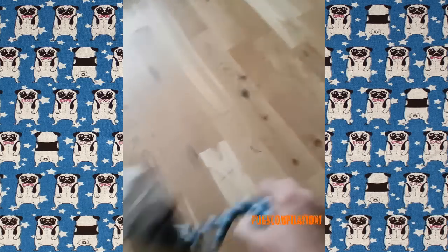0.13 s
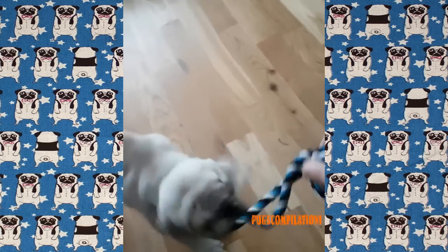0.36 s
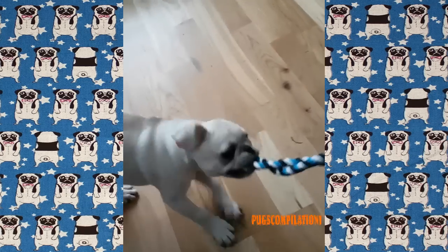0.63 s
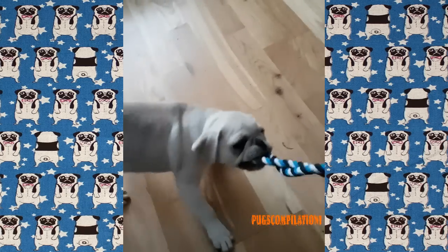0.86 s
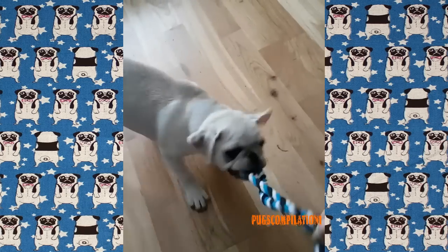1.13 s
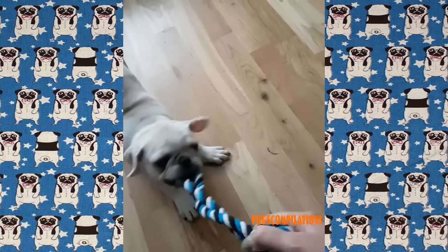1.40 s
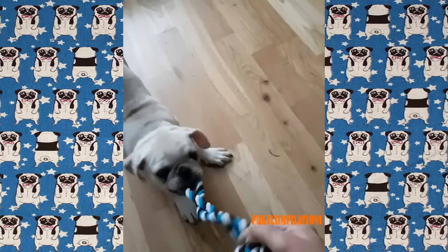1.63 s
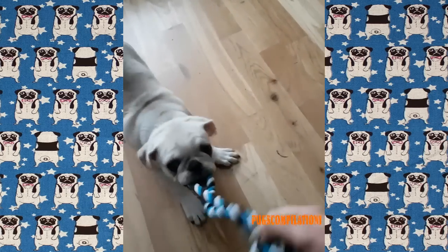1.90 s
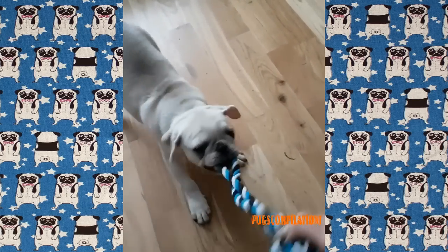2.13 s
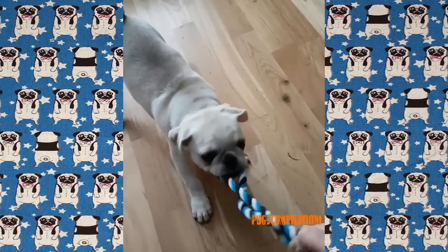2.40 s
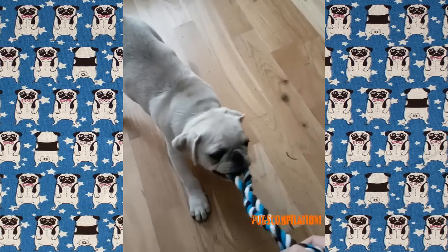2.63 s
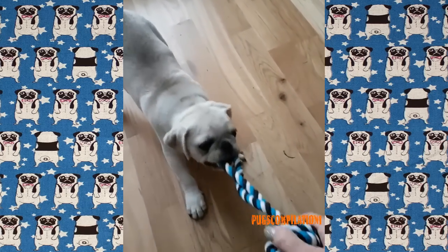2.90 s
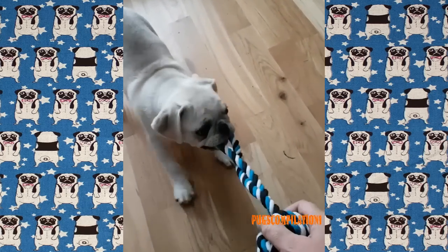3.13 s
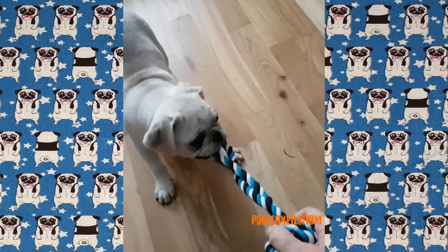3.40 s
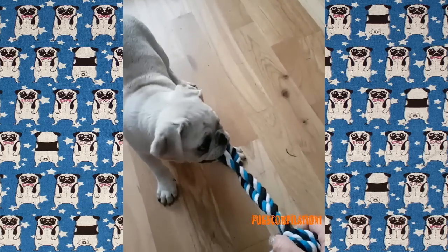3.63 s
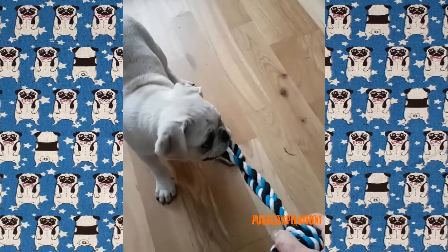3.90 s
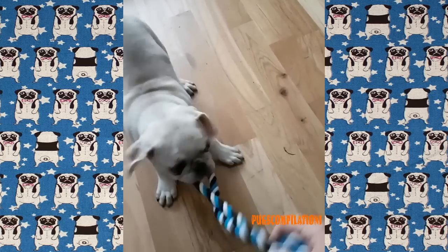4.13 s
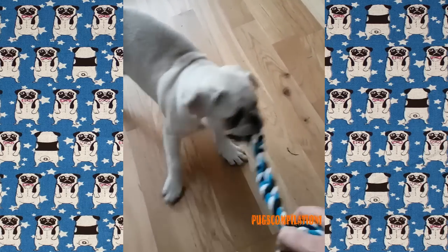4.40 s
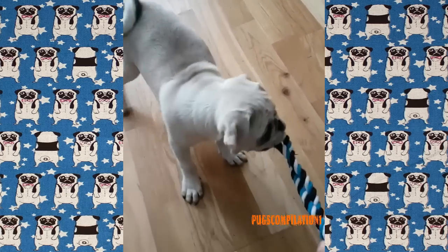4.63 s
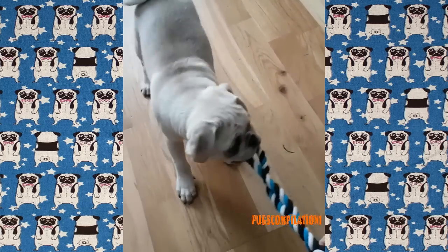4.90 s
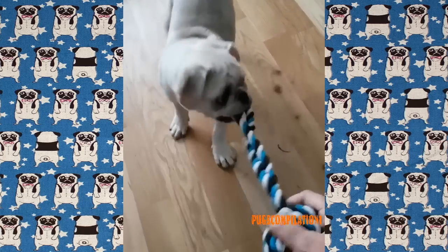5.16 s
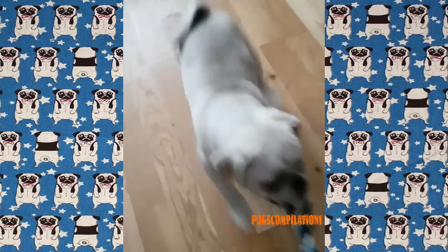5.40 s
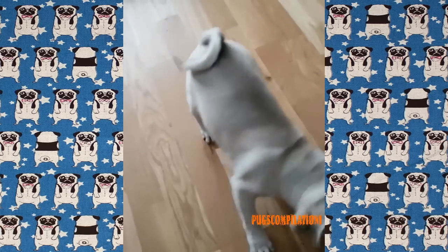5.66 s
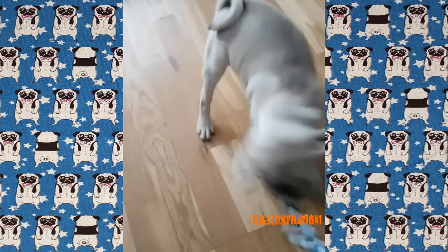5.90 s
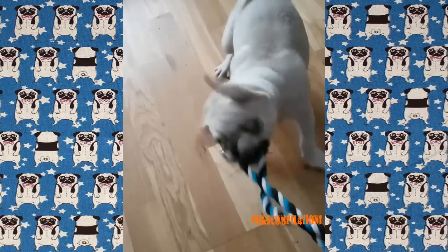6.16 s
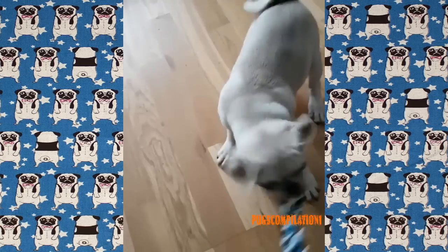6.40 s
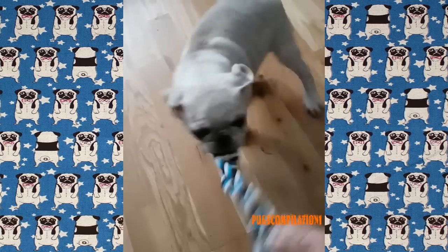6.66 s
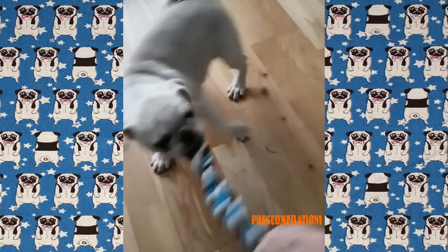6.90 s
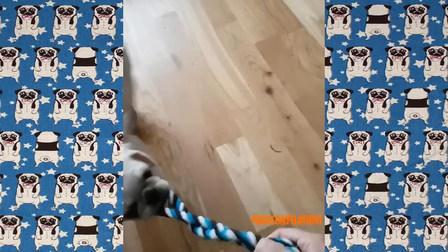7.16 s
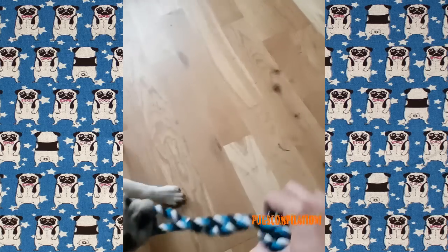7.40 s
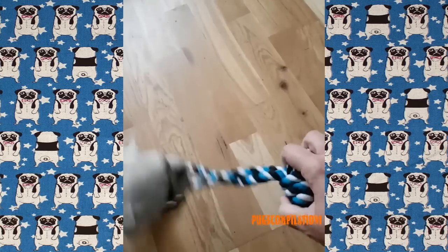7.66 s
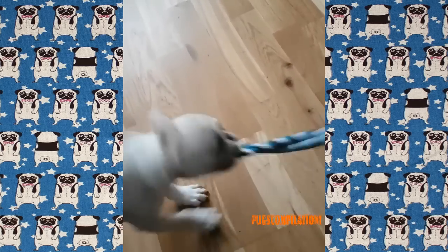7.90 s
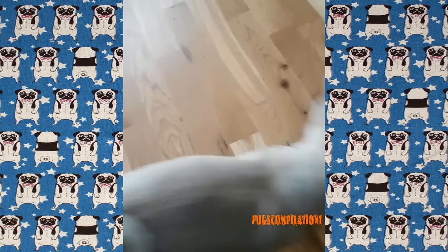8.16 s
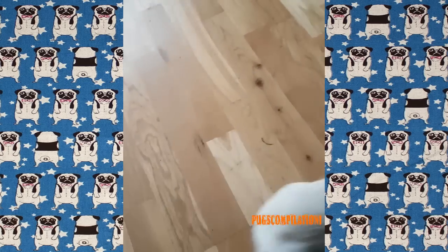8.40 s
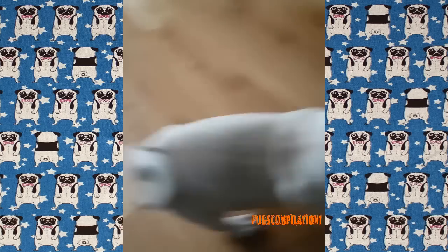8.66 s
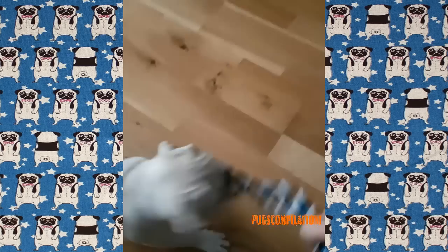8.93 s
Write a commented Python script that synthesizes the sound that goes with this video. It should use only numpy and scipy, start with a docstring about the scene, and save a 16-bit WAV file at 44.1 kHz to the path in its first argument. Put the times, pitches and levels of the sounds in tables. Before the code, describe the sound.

Close, throaty puppy growls come in short playful bursts, snuffling breaths between them, a thin tag rattle, soft indoor hum beneath.

```python
"""A young flat-faced dog growls in bursts around a rope that it tugs, in a small room.
Uneven vocal pulses and noisy puffs ring chest, jaw, mouth and nose; breaths rasp between and under the growls.
A small metal tag tinks now and then: narrow-band noise that dies away while it rattles.
Shaped noise and two wavering hum tones lie under it; sparse echoes make the room.
Two close microphone ports hear the dog and tag with a small difference in level and time."""
import sys
import numpy as np
from scipy import signal
from scipy.fft import rfft, irfft
from scipy.io import wavfile
from scipy.ndimage import uniform_filter1d

SR = 44100
rng = np.random.default_rng(int(sys.argv[2]) if len(sys.argv) > 2 else 0)


def output_pcm(signal):
    """Save a mono or channel-first signal as 16-bit PCM at the path in sys.argv[1].

    Samples are clipped to [-1, 1] before scaling.
    """
    pcm = np.clip(np.atleast_2d(signal).T, -1, 1) * 32767
    wavfile.write(sys.argv[1], SR, np.round(pcm).astype(np.int16))


def amplitude_ratio(level_db):
    """Convert a level in decibels to the matching linear amplitude (field) ratio."""
    exponent = np.asarray(level_db, float) / 20
    return 10 ** exponent


N = 398663  # length in samples

# One curve a growl or part of one; the growl from .565 s turns clearer at 1.075 s.
# Points of: time_s, chest_level_db, snarl_over_chest_db, pitch_hz
GROWL_CURVES = [
    [(0, -35.5, 10, 198.7), (.068, -31.5, 2, 216.2), (.12, -43, 6, 195.2)],
    [(.235, -42, -4.5, 295.6), (.275, -30, -2, 270), (.302, -32, 3.5, 255.3), (.365, -32, -0.5, 252.4),
     (.41, -30.5, 2, 207.6), (.44, -36.5, 0, 195.5), (.49, -42, -5, 149.4)],
    [(.565, -36, -3, 159.7), (.68, -31.5, -3.5, 159.7), (.7, -35.5, 1.5, 162.9), (1.0, -29, -5, 174.1),
     (1.06, -37.5, 6, 189.8)],
    [(1.075, -39, 6, 193.3), (1.25, -37, 3, 197.5), (1.32, -37.5, -5.5, 150)],
    [(1.679, -50, 3.5, 145.6), (1.706, -38.5, -7, 155), (1.85, -40.5, -2, 155.2), (1.98, -33, -4, 153.5),
     (2.21, -45.5, -7, 204.5)],
    [(2.887, -46, -6, 154.7), (3.0, -47.5, -8, 160.9), (3.11, -64, 4, 204.9)],
    [(4.225, -54, 3, 192.7), (4.238, -35.5, -0.5, 188), (4.32, -46.5, 1, 174.7)],
    [(4.463, -41.5, 0, 202.4), (4.667, -35.5, 2, 196.5), (4.84, -30, -4.5, 196), (4.95, -28.5, -4.5, 204),
     (5.02, -28, -4.5, 225.6), (5.1, -45.5, 4.5, 186.3)],
    [(5.38, -47.5, -13, 149.4), (5.58, -39.5, -17, 184.4)],
    [(5.6, -45.5, 9, 225.3), (5.66, -34.5, 3, 248.3), (5.756, -33, -1, 192.3), (5.83, -34, 2, 221.6),
     (5.92, -31, 7, 232.9), (5.97, -30.5, -5, 238.2), (6.015, -37.5, 11.5, 241.9),
     (6.07, -35.5, -0.5, 225.2), (6.125, -36.5, -9.5, 195.8), (6.18, -49, 14, 185.9)],
    [(6.19, -42, 0.5, 191.3), (6.238, -21.5, -5, 196.3), (6.28, -59, 5, 180.3)],
    [(6.45, -43.5, -8, 149.9), (6.54, -53, -6, 153.3)],
    [(6.594, -35.5, -4.5, 160.5), (6.75, -34.5, 3.5, 199.7), (6.86, -36.5, 7, 192.1),
     (6.94, -28.5, -5, 195.4), (7.02, -44, 4.5, 170.1)],
    [(7.377, -39.5, -1.5, 174.8), (7.44, -36, 6.5, 189.2), (7.53, -36.5, 2.5, 213.6),
     (7.64, -36, 0.5, 185.6), (7.78, -31.5, 8, 211.3), (7.845, -31.5, -0.5, 220)],
    [(7.96, -46, -2, 245.1), (8.03, -37, 13, 232), (8.075, -33.5, 9, 224.6), (8.12, -32.5, 5.5, 224.3),
     (8.2, -41.5, 8, 171.5)],
    [(8.292, -29, -6, 202.7), (8.35, -34, 11, 222), (8.42, -26.5, 0.5, 202.4), (8.48, -28.5, 6.5, 238.8),
     (8.59, -29.5, -1, 215.1), (8.7, -37, 0.5, 187.3)],
    [(8.74, -39.5, -10, 147), (8.8, -37.5, -15, 156.1), (8.9, -33, -11, 178.2), (9.0, -34, -3, 205),
     (9.04, -42, -5, 226.1)],
]


def evened(x):
    """Scales to rms 1."""
    return x / np.sqrt(np.mean(x ** 2) + 1e-20)


def read(points, hz):
    """Reads a spectrum on a log-frequency axis."""
    f, value = np.transpose(points)
    return np.interp(np.log(hz + 1), np.log(f + 1), value)


def resonate(x, hz, width):
    """Shifts hz down to zero, smooths twice and shifts back: a steep resonance of gain 1."""
    turn = np.exp(2j * np.pi * np.cumsum(hz * np.ones(N)) / SR)
    r = np.exp(-np.pi * width / SR)
    smooth = signal.lfilter([(1 - r) ** 2], [1, -2 * r, r * r], x / turn)
    return 2 * (turn * smooth).real


def tract(x, modes):
    """A set of resonances side by side, neighbours in opposite phase."""
    return sum((-1) ** k * amplitude_ratio(db) * resonate(x, hz, width) / np.sqrt(width)
               for k, (hz, width, db) in enumerate(modes))


def wobble(hz, width):
    """Random motion around hz, rms 1."""
    return evened(resonate(rng.standard_normal(N), hz, width))


def room_noise():
    """Soft patchy noise, shaped in frequency; the two ports share mostly its long waves."""
    # Relative noise spectrum: pitch_hz, density_db (per Hz)
    air_spectrum = [(82, 5.5), (140, 2.5), (289, 5), (350, -2.5), (587, -1.5), (2110, -5.5), (7180, -25.5),
                    (12500, -27), (13500, -26)]
    frames, hz = N // 256 + 5, np.fft.rfftfreq(1024, 1 / SR)
    a, b, c, d, patches = rng.standard_normal((frames, 513, 5)).T
    patches = uniform_filter1d(patches, 8, 0)  # over frequency
    patches = evened(uniform_filter1d(patches, 20, 1))  # over time
    same = (0.67 / (1 + hz / 500))[:, None]
    left = a + 1j * b
    right = same * left + np.sqrt(1 - same ** 2) * (c + 1j * d)
    z = np.array([left, right]) * amplitude_ratio(read(air_spectrum, hz)[:, None] + 1.2 * patches)
    noise = signal.istft(z, nperseg=1024, noverlap=768)[1][:, :N]
    return amplitude_ratio(-62.5) * evened(noise)


def hum():
    """An appliance hum: steady tones, each wavering a little with narrow noise around it."""
    # Hum tones: pitch_hz, steady_rms_db
    hum_tones = [(96.9, -68.5), (1459, -81)]
    t = np.arange(N) / SR
    return sum(amplitude_ratio(db) * (np.sqrt(2) * np.sin(2 * np.pi * f * t) + .5 * wobble(f, 56))
               for f, db in hum_tones)


def room(x):
    """Sparse taps of random sign, each band dying at its own speed; as the dog shifts, three tails take turns."""
    # Decay of the echoes: pitch_hz, t60_s
    decay_times = [(200, 0.21), (1000, 0.29), (4000, 0.28), (12000, 0.19)]
    # Tone of the echoes at their start: pitch_hz, level_db
    echo_colour = [(200, 0.5), (1000, -2), (5000, 3)]
    moves_per_s = 1.3
    taps = np.zeros((3, 2, SR // 2))  # tail, port, sample
    at = np.arange(90, SR // 2 - 20, 20) + rng.integers(0, 20, (3, 2, (SR // 2 - 91) // 20))
    np.put_along_axis(taps, at, rng.choice([-1., 1.], at.shape), 2)
    hz, t, z = signal.stft(taps, SR, nperseg=256)
    same = 1 / (1 + (hz[:, None] / 900) ** 2)  # close ports share the long waves
    z[:, 1] = same * z[:, 0] + np.sqrt(1 - same ** 2) * z[:, 1]
    fade_db = read(echo_colour, hz)[:, None] - 60 * t / read(decay_times, hz)[:, None]
    tail = signal.istft(z * amplitude_ratio(fade_db), SR, nperseg=256)[1]
    tail = tail / np.linalg.norm(tail[:, :1], axis=2, keepdims=True)
    phase = moves_per_s * np.arange(N) / SR + np.arange(3)[:, None] / 3
    turn = np.cos(np.pi * phase) * np.sqrt(2 / 3)
    return signal.fftconvolve((x * turn)[:, None], tail, axes=2)[..., :N].sum(0)


def tag():
    """A dangling tag rings thinly in one narrow band, rattling as it dies."""
    # Tinks: peak_s, level_db (before the rattle and the mix)
    tinks = [(0.7321, -63), (0.9541, -58.5), (4.23, -58), (6.3213, -52), (6.64, -46), (6.8625, -51),
             (6.969, -50), (7.0308, -55), (7.1431, -62)]
    rise_s, t60_s = 0.028, 0.32
    t = np.arange(N) / SR
    strength = sum(amplitude_ratio(db - 60 * abs(t - s) / t60_s) * np.clip((t - s) / rise_s + 1, 0, 1) for s, db in tinks)
    rattle = amplitude_ratio(4.6 * wobble(31, 45))
    return strength * wobble(12110, 180) * rattle


def breaths():
    """Each breath swells and fades in one arch; returns its strength and mouth resonance."""
    # Breaths through nose and rope: start_s, length_s, peak_db, resonance_hz
    breath_list = [(0.095, 0.45, -46.5, 1270), (1.352, 0.25, -51.5, 1525), (2.115, 0.15, -40, 2100),
                   (2.333, 0.43, -60.5, 1513), (3.057, 0.17, -61, 1564), (4.27, 0.19, -59.5, 1400),
                   (5.14, 1, -47.5, 1520), (6.21, 0.35, -48, 1436), (6.957, 0.36, -46.5, 1464),
                   (7.856, 0.43, -41, 1346), (8.18, 0.13, -44, 1486)]
    t = np.arange(N) / SR
    arches = np.array([amplitude_ratio(db) * np.sin(np.pi * np.clip((t - s) / length, 0, 1)).clip(0) ** 0.37
                       for s, length, db, _ in breath_list])
    return arches.sum(0), np.array(breath_list)[arches.argmax(0), 3]


def growls():
    """Controls of the voice: each curve starts abruptly and rough, settles, and is let go."""
    # Base roughness of each curve, 0-1
    base_rough = [.3, .2, .6, .27, .62, .8, .27, .4, .6, .47, .27, .6, .46, .48, .16, .33, .42]
    # Mouth of each curve: settled_jaw_over_snarl_db, start_hz, midway_hz, end_hz
    mouth = np.array([(-6.5, 1220, 1300, 1370), (-12, 1260, 1410, 1506), (-2.5, 1340, 1490, 1440),
                      (-1, 1584, 1460, 1490), (4, 1590, 1680, 2560), (0.5, 1640, 1590, 1670),
                      (-6.5, 1500, 1360, 1370), (-1, 1425, 1029, 1350), (-7, 620, 560, 640),
                      (-1.5, 1310, 1575, 1210), (-0.5, 1260, 1420, 1200), (-28, 1617, 2100, 1000),
                      (0.5, 1440, 1650, 1380), (1, 1444, 1540, 1420), (-8.5, 1170, 1464, 1370),
                      (-9.5, 1260, 1167, 1100), (9.5, 1430, 1650, 2030)])
    # Ring of each curve: overtones_db, nose_start_hz, nose_end_hz
    ring = np.array([(6.5, 3010, 2980), (3.5, 3030, 3460), (2, 2940, 3200), (6, 3300, 3330),
                     (2, 2500, 3330), (10, 3300, 3320), (-2.5, 4300, 2900), (-6.5, 3200, 3050),
                     (6, 4200, 3600), (9, 3400, 3500), (-1.5, 3230, 2800), (8, 3800, 3102),
                     (-8, 3470, 3500), (1, 3120, 3260), (10.5, 3700, 3470), (5, 2800, 3350),
                     (7.5, 3150, 3610)])
    attack_s, release_db_per_s = .003, 420
    rough_settle_s, jaw_open_s = .12, 0.15
    t = np.arange(N) / SR
    gate = 0
    for g in GROWL_CURVES:
        attack = np.clip((t - g[0][0]) / attack_s + 1, 0, 1)
        release = amplitude_ratio(-release_db_per_s * np.maximum(t - g[-1][0], 0))
        gate = gate + attack * release * amplitude_ratio(np.interp(t, *np.transpose(g)[:2]))
    s, _, lips_db, pitch = np.transpose(sum(GROWL_CURVES, []))
    snarl = gate * amplitude_ratio(np.interp(t, s, lips_db))
    ends = np.ravel([(g[0][0], g[-1][0]) for g in GROWL_CURVES])
    starts = ends[::2]
    which = np.maximum(np.searchsorted(starts, t + attack_s) - 1, 0)  # latest curve begun
    since = abs(t - starts[which])
    rough = np.array(base_rough)[which] * (1 + .2 * (2 * np.exp(-since / rough_settle_s) - .5))
    jaw_db = mouth[which, 0] - 3 * np.exp(-since / jaw_open_s)  # jaw tone comes in behind the onset
    mouth_s = np.linspace(starts, ends[1::2], num=3).T.ravel()
    mouth_hz = np.interp(t, mouth_s, mouth[:, 1:].ravel())
    nose_hz = np.interp(t, ends, ring[:, 1:].ravel())
    return gate, snarl, np.interp(t, s, pitch), np.clip(rough, 0, 1), jaw_db, mouth_hz, ring[which, 0], nose_hz


def folds(pitch, rough):
    """One pulse a cycle, uneven in time and size; slack tissue slaps open unevenly and chokes them again."""
    # Extra snaps within the voice: time_s
    snap_times = [.694, 1.934, 5.618, 6.702]
    jitter, shimmer_db, slap_db, slaps_per_s = .15, 5.5, 9.5, 38
    turns = np.cumsum(pitch * (1 + jitter * rough * wobble(0, 150))) / SR
    cycle = turns.astype(int)
    size_db = shimmer_db * rough * rng.standard_normal(N // 50).clip(-3, 1.3)[cycle]
    slaps = np.cumsum(slaps_per_s * (1 + .35 * wobble(0, 12).clip(-2, 2))) / SR
    depth = rng.uniform(.5, 1.5, N // 400)[slaps.astype(int)]
    flutter_db = slap_db * (1.1 + rough) * depth * (.5 - slaps % 1)
    flutter = uniform_filter1d(amplitude_ratio(flutter_db), size=220)
    pulses = evened(np.diff(cycle, prepend=0) * amplitude_ratio(size_db) * flutter * np.sqrt(SR / pitch))
    snaps = np.zeros(N)
    snaps[[int(g[0][0] * SR) for g in GROWL_CURVES]] = amplitude_ratio(4)  # start of each curve
    snaps[[int(s * SR) for s in snap_times]] = amplitude_ratio(11)
    puffs = (0.3 + np.exp(-(turns % 1) / 0.1)) * flutter * rng.standard_normal(N)
    return pulses + snaps * np.sqrt(SR / pitch), evened(puffs)


def chest_tone(pulses, drive, pitch, rough, overtones_db):
    """The chest rings at the pitch, its overtones and two fixed resonances; roughness thins the overtones."""
    # Chest resonances: centre_hz, width_hz, level_db
    chest_modes = [(205, 115, -2.5), (312.5, 54, -4)]
    # Second to fifth partial: base_level_db
    partials_db = [-8, -9, -17, -19]
    chest = resonate(pulses, pitch, 133.7) / np.sqrt(110) + tract(drive, chest_modes)
    for k, db in enumerate(partials_db):
        partial = resonate(pulses, (k + 2) * pitch, 52) / np.sqrt(110)
        chest = chest + amplitude_ratio(db + overtones_db) * (1 - 0.93 * rough) * partial
    return evened(chest)


def dog():
    """Pulses and puffs ring chest, jaw, mouth and nose; between growls only breath is left."""
    # Jaw resonance: centre_hz, width_hz
    jaw_hz, jaw_width = (889, 288)
    # Palate resonances before drift: centre_hz, width_hz, level_db
    palate_modes = [(1850, 267, -11), (2285, 250, -15.5)]
    # Nose resonances of the hiss: centre_hz, width_hz, relative_level_db
    nose_modes = [(3000, 630, -0.5), (4100, 1020, 1.5), (6090, 2540, -1.5), (8280, 1600, -4),
                  (10840, 3900, -10.5)]
    # Nostril resonances of the breath: centre_hz, width_hz, relative_level_db
    rasp_modes = [(2474, 340, 6.5), (3795, 260, -5)]
    mouth_width, breath_width = 340, 510  # Hz
    chest_gain, growl, pitch, rough, jaw_db, mouth_hz, overtones_db, ring_hz = growls()
    breath, breath_hz = breaths()
    pulses, puffs = folds(pitch, rough)

    level = np.sqrt(growl ** 2 + breath ** 2 + 1e-14)
    voiced = (growl / level) ** 2
    breathy = 1 - voiced
    shift = 1 + .04 * wobble(0, 10).clip(-2, 2)  # tongue and rope never lie still
    mouth_hz = (voiced * mouth_hz + breathy * breath_hz) * shift
    ring_hz = ring_hz * np.sqrt(shift)
    jaw_db = voiced * jaw_db + breathy * -12.5
    # hiss over snarl shrinks as the level grows
    growl_hiss_db = -15 - 0.25 * (20 * np.log10(level) + 42.5)
    hiss_db = voiced * growl_hiss_db + breathy * -8.5

    air = 1 - voiced * (1 - 0.96 * rough)  # share of noise power in the drive
    drive = np.sqrt(1 - air) * pulses + np.sqrt(air) * puffs
    chest = chest_tone(pulses, drive, pitch, rough, overtones_db)
    growl_mouth = resonate(drive, mouth_hz, mouth_width) / np.sqrt(mouth_width)
    breath_mouth = resonate(drive, mouth_hz, breath_width) / np.sqrt(breath_width)
    palate = tract(drive, [(hz * shift, width, db) for hz, width, db in palate_modes])
    snarl = voiced * growl_mouth + breathy * breath_mouth + palate
    jaw = resonate(drive, jaw_hz, jaw_width)
    hiss = tract(0.033 * drive + puffs, nose_modes)
    nose_ring = resonate(drive, ring_hz, 410)
    rasp = tract(puffs, rasp_modes)

    upper = evened(snarl) + amplitude_ratio(jaw_db) * evened(jaw) + amplitude_ratio(hiss_db) * evened(hiss)
    upper = upper + voiced * amplitude_ratio(-17.5) * evened(nose_ring) + breathy * amplitude_ratio(-8) * evened(rasp)
    # a narrow dip 438 Hz under the nose resonance thins the tone
    upper = upper - 0.84 * resonate(upper, ring_hz - 438, 93)
    voice = chest_gain * chest + level * upper
    return signal.sosfilt(signal.butter(N=2, Wn=125, btype="high", fs=SR, output="sos"), voice)


def scene():
    """The direct sound of dog and tag reaches the left port a little later and weaker than the right."""
    left_over_right_db, left_lag = -2.5, 3.9  # lag in samples
    near = (dog() + tag()) * amplitude_ratio(-1.0)
    lag = np.exp(-2j * np.pi * np.arange(N // 2 + 1) / N * left_lag)
    left = irfft(rfft(near) * lag, N) * amplitude_ratio(left_over_right_db / 2)
    right = near * amplitude_ratio(-left_over_right_db / 2)
    echoes = amplitude_ratio(3 + np.array([[-0.14], [0.14]])) * room(near)
    return np.array([left, right]) + echoes + room_noise() + hum()


def low_pass(x):
    """Removes everything above the highest recorded frequency."""
    return signal.sosfilt(signal.butter(12, 13500, fs=SR, output="sos"), x)


def record(dry):
    """The microphone drops the deep bass with a gentle slope below 60 Hz."""
    clear = signal.sosfilt(signal.butter(1, 60, "high", fs=SR, output="sos"), dry)
    return low_pass(clear)


dry = scene()
out = record(dry)
output_pcm(out)
```